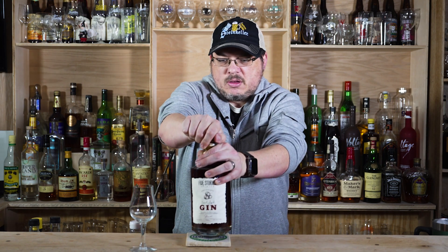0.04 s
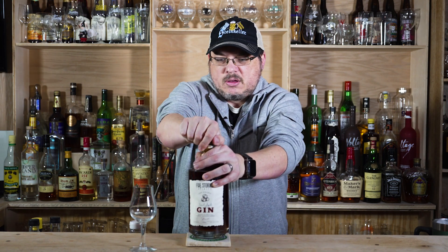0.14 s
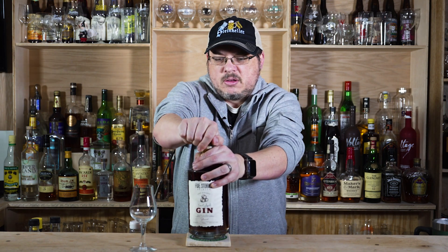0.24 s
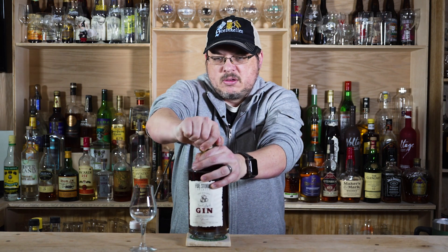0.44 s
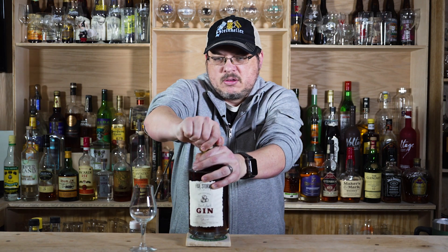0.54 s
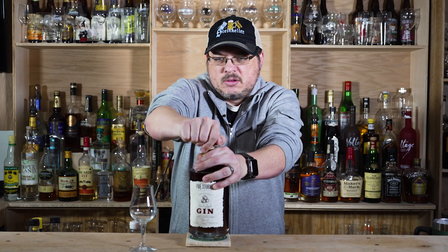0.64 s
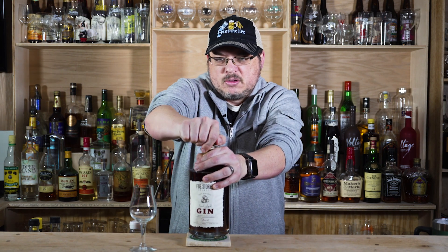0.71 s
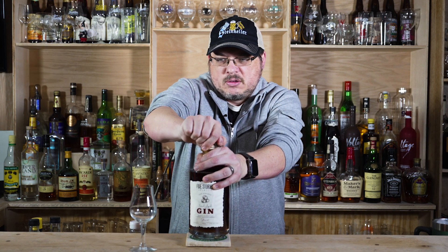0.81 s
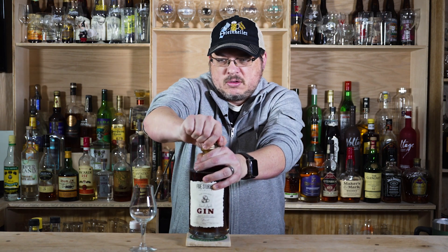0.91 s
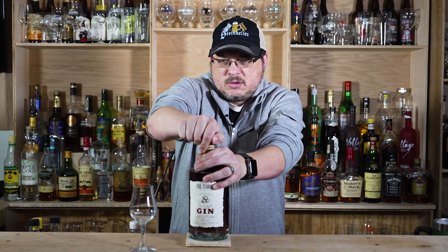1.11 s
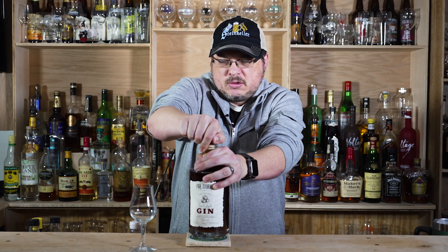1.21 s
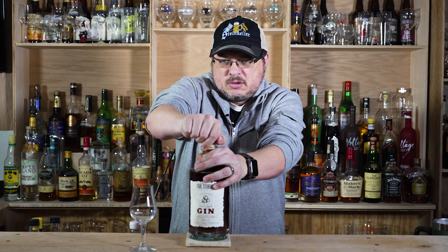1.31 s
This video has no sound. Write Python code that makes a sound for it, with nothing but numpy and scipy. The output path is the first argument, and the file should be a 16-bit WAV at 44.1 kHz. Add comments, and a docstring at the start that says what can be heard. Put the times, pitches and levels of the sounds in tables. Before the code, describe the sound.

A cork stopper is twisted in a glass bottle. It lets go with one sharp snap, chatters briefly, then gives two duller, squeaky knocks, with faint rubbing and tiny ticks between them in a small quiet room.

```python
"""In a small quiet room, a cork stopper is twisted loose in a glass bottle.
The stuck cork lets go with one sharp snap that rings the glass, and chatters as it drags.
Then it gives duller knocks as it is rocked in the neck.
In between, the cork rubs faintly on the glass, with tiny dry ticks."""
import sys
import numpy as np
from scipy import signal
from scipy.fft import rfft, irfft
from scipy.io import wavfile

SR = 44100
rng = np.random.default_rng(int(sys.argv[2]) if len(sys.argv) > 2 else 0)


def to_wav(sig):
    """Store sig (one row per channel, or 1-D mono) as 16-bit WAV at the path in sys.argv[1].

    Samples outside -1..1 are clipped; the rate is SR.
    """
    pcm = np.clip(np.atleast_2d(sig), -1, 1) * 32767
    pcm = np.round(pcm).astype(np.int16)
    wavfile.write(sys.argv[1], SR, pcm.T)  # frames by channels


N = 59535
T = np.arange(N) / SR


def amp(db):
    """Turns decibels into a number to multiply by."""
    return 10 ** (np.asarray(db) / 20)


def unit(x):
    """Scales a sound so that its average strength (rms) is 1."""
    return x / np.sqrt(np.mean(x ** 2) + 1e-20)


def look_up(table, hz):
    """Reads between the rows of a table, on a log-frequency scale."""
    f, value = np.transpose(table)
    return np.interp(np.log(hz + 1), np.log(f + 1), value)


def colour(x, table):
    """Turns each frequency of a sound up or down as the table says."""
    gain = amp(look_up(table, np.fft.rfftfreq(len(x), 1 / SR)))
    return irfft(rfft(x) * gain, len(x))


def swell(centre, half):
    """A smooth rise and fall, shaped like a bell."""
    return np.exp(-((T - centre) / half) ** 2)


def slips(per_second=2000, spread_db=3.5):
    """Cork slides in many tiny jerks: clicks of uneven size at random moments."""
    size = amp(spread_db * np.minimum(rng.exponential(1, N), 4))
    return size * rng.choice([-1., 1.], N) * (rng.random(N) < per_second / SR)


# tone colour of the room's background: f/Hz, relative level/dB
BACKGROUND_COLOUR = [(20, -48.5), (45, -19), (75, -0.5), (120, 3), (200, -7), (380, -3), (600, -14.5),
                     (1500, -16), (3000, -21), (7600, -28.5), (8200, -49.5), (16000, -50.5)]
# its level, with dips at set times for the recorder's noise suppression: t/s, level/dB
SUPPRESSED_LEVEL = [(0, -63), (.2, -63.5), (.28, -64), (.37, -70.5), (.43, -64.5), (.64, -63.5),
                    (.74, -68.5), (.82, -68.5), (.89, -66.5), (1.12, -66.5), (1.22, -63.5), (1.35, -70)]
def background():
    """Faint, low room noise; the recorder's noise suppression lowers it after the snap and loud knock."""
    level_db = np.interp(T, *np.transpose(SUPPRESSED_LEVEL))
    return amp(level_db) * unit(colour(rng.standard_normal(N), BACKGROUND_COLOUR))


# light rubs of cork and fingers on glass: middle t/s, half length/s, level/dB
RUBS = [(0.047, 0.021, -68.5), (0.394, 0.04, -66.5), (0.448, 0.036, -61.5), (0.547, 0.047, -59),
        (.675, .025, -70.5), (0.968, 0.0096, -70), (1.028, 0.025, -69.5), (1.164, 0.025, -70.5),
        (1.225, 0.015, -69), (1.33, 0.024, -68)]
# their tone colour: f/Hz, relative level/dB
RUB_COLOUR = [(200, -7.5), (600, -1), (1700, 4.5), (3000, 1.5), (5000, -5), (7800, -7), (8200, -41.5),
              (16000, -67.5)]
def rubbing():
    """Tiny slips blur into a faint, gritty hiss while the stopper turns freely."""
    loudness = sum(amp(db) * swell(centre, half) for centre, half, db in RUBS)
    return loudness * unit(colour(slips(), RUB_COLOUR))


# tiny dry ticks: t/s, peak level/dB
TICKS = [(.052, -46.5), (.109, -45.5), (0.1364, -40), (.176, -45), (.4035, -54), (0.447, -38), (.464, -49),
         (.52, -43), (0.5491, -44.5), (0.7841, -42.5), (0.962, -50), (1.1848, -45.5), (1.219, -50.5),
         (1.238, -45.5)]
# their tone colour: f/Hz, relative level/dB
TICK_COLOUR = [(200, -16), (900, -3), (2000, 4), (4000, 1), (7600, -9), (8200, -30.5), (16000, -57)]
def ticks():
    """The cork catches for an instant, too briefly to make anything ring."""
    out = np.zeros(N)
    for start, db in TICKS:
        click = 1. * (np.arange(N) == round(start * SR))
        tick = colour(click, TICK_COLOUR)
        out += amp(db) * tick / (abs(tick).max() + 1e-12)
    return out


# bursts of chatter: middle t/s, half length/s, level/dB, lowest f/Hz, highest f/Hz
CHATTER_BURSTS = [(0.217, .009, -51, 650, 1730), (0.234, 0.0086, -39, 129, 2450),
                  (0.278, 0.01, -32, 169, 2200), (0.312, 0.022, -50.5, 160, 327),
                  (.329, 0.025, -43.5, 650, 2224), (0.366, 0.029, -50.5, 920, 1770),
                  (0.666, 0.0079, -53.5, 600, 1600), (0.682, 0.0078, -41, 500, 2170),
                  (0.692, 0.017, -47, 216, 2600), (0.734, .006, -52.5, 600, 1196),
                  (0.898, 0.023, -72.5, 1380, 1474), (1.021, 0.019, -63.5, 248.3, 1280),
                  (1.167, 0.0079, -58, 197, 901), (1.193, .022, -52.5, 70, 428)]
# their tone colour: f/Hz, relative level/dB
CHATTER_COLOUR = [(60, -24), (160, -4.5), (250, 2), (350, 1.5), (470, -9.5), (720, 2.5), (950, 1),
                  (1250, -6.5), (1620, 3.5), (2050, -3.5), (2500, -5), (3500, -16.5)]
def chatter():
    """Under strain the cork drags in short, muffled bursts of slips, each in its own pitch range."""
    out = np.zeros(N)
    for centre, half, db, low_hz, top_hz in CHATTER_BURSTS:
        band = signal.butter(4, [low_hz, top_hz], "bandpass", fs=SR, output="sos")
        drag = signal.sosfilt(band, colour(slips(), CHATTER_COLOUR))
        shape = swell(centre, half)
        burst = drag * shape
        out += amp(db) * burst * np.linalg.norm(shape) / np.linalg.norm(burst)
    return out


SNAP_START_S = 0.2358
# short tones of stopper and glass: f/Hz, level/dB, time to fade by 60 dB/s
SNAP_TONES = [(270, -8.5, .036), (529.7, -23, .05), (758.3, -7, 0.017), (974.6, 3, .012), (1379.7, 4, .01),
              (1600, -18, 0.069), (1755, -1, 0.012), (2095, -22, .05), (2780, -25, .035), (3530, -18, .016),
              (5430, -22.5, 0.00091)]
# the thin after-ring of the glass: f/Hz, level/dB, time to fade by 60 dB/s
GLASS_TONES = [(1567, -37.5, .28), (1624, -43, 0.16), (2726, -40.5, .2), (3486, -42, 0.087),
               (3775, -52, .06)]
def snap(rise_cycles=0.52, echo_s=0.0063, echo_db=-17.5, room_db=-29):
    """The seal gives way at once and rings stopper and glass; the sound bounces off the bar top."""
    t = np.maximum(T - SNAP_START_S, 0)
    ring = np.zeros(N)
    for k, (hz, db, fade_s) in enumerate(SNAP_TONES + GLASS_TONES):
        rise = 1 - np.exp(-t * hz / rise_cycles)
        fade = amp(db - 60 * t / fade_s)
        direction = (-1) ** k  # every other tone starts by swinging the opposite way
        ring += direction * fade * rise * np.sin(2 * np.pi * hz * t)
    echo = np.interp(T - echo_s, T, ring, left=0)
    return ring + amp(echo_db) * echo + amp(room_db) * room_echo(ring)


# tone colour of the seal's dry crack: f/Hz, relative level/dB
CRACK_COLOUR = [(1500, -11), (2250, 8.5), (2650, -3), (3600, 1.5), (4400, -9.5), (5900, -2.5),
                (6700, -10.5), (7800, -40.5), (16000, -60)]
def crack(db=-31.5, fade_s=0.03):
    """The tearing seal adds a short spray of bright noise to the snap."""
    t = T - SNAP_START_S
    fade = (t > 0) * amp(db - 60 * abs(t) / fade_s)
    return fade * unit(colour(rng.standard_normal(N), CRACK_COLOUR))


# how long the room holds a sound: f/Hz, time to fade by 60 dB/s
ROOM_FADE = [(150, 0.07), (400, .1), (800, 0.12), (1700, 0.14), (3500, 0.13), (7000, 0.016)]
def room_echo(x, rise_s=0.0073):
    """The room's echoes blur into a short tail, each frequency dying away at its own speed."""
    hz, t, spectrum = signal.stft(rng.standard_normal(SR // 2), SR, nperseg=256)
    fade = amp(-60 * t / look_up(ROOM_FADE, hz)[:, None])
    tail = signal.istft(spectrum * fade, SR, nperseg=256)[1]
    tail *= np.minimum(np.arange(len(tail)) / SR / rise_s, 1)
    return signal.fftconvolve(x, tail / np.linalg.norm(tail))[:N]


# the stopper rocking in the neck: start t/s, length/s, level/dB, pitch f/Hz, glide/octaves,
# overtone change per multiple of the pitch/dB, room echo level/dB
KNOCKS = [(0.414, 0.011, -45.5, 798, 0.14, -9, -11), (0.6808, 0.0098, -8.5, 744, -0.53, -3, -33),
          (0.6876, 0.013, -17.5, 774, -0.34, -1.5, -32.5), (0.693, 0.03, -34.5, 787.5, 0.024, -13, -26),
          (0.7124, 0.02, -41, 735, 0, -11, -29), (1.0107, .012, -55.5, 698, -0.096, -7, -14.5),
          (1.1721, 0.013, -21, 739, 0.48, -8.5, -28.5)]
# the tones in one knock: multiple of its pitch, relative level/dB, multiple of its length
KNOCK_TONES = [(.465, -22, 1.49), (1, -1.5, 0.98), (1.38, -11.5, 0.65), (1.97, -8.5, 0.86),
               (2.28, -19, 0.67), (3.2, -31, 1.05)]
def knocks():
    """Each knock is a very short squeak: the cork slips, its tone swells and glides, and it sticks."""
    direct, to_room = np.zeros(N), np.zeros(N)
    for start, length, db, hz, glide, overtone_db, room_db in KNOCKS:
        progress = np.maximum(T - start, 0) / length
        pitch_hz = hz * 2 ** (glide * (np.minimum(progress, 1) - .5))
        cycles = np.cumsum((progress > 0) * pitch_hz) / SR
        for multiple, tone_db, stretch in KNOCK_TONES:
            shape = np.sin(np.pi * np.minimum(progress / stretch, 1)) ** 2
            gain = amp(db + tone_db + overtone_db * max(multiple - 1, 0))
            tone = gain * shape * np.sin(2 * np.pi * multiple * cycles)
            direct += tone
            to_room += amp(room_db) * tone
    return direct + room_echo(to_room)


def scene():
    """Adds the cork and bottle sounds to the quiet room, in one channel."""
    return (background() + rubbing() + ticks() + chatter() + snap() + crack() + knocks())[None]


def record(dry, limit=1.0, top_hz=16500):
    """Flattens any peak of the snap that passes the limit, then removes the highest treble."""
    lowpass = signal.firwin(255, top_hz, window=("kaiser", 8), fs=SR)
    return signal.oaconvolve(np.clip(dry, -limit, limit), lowpass[None], "same")


dry = scene()
out = record(dry)
to_wav(out)
```